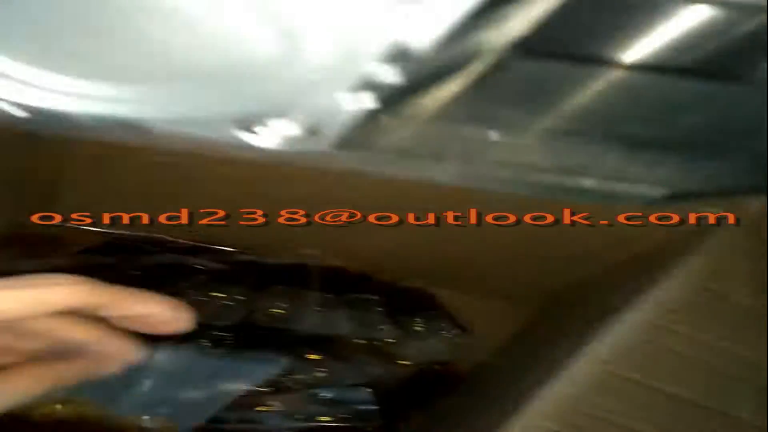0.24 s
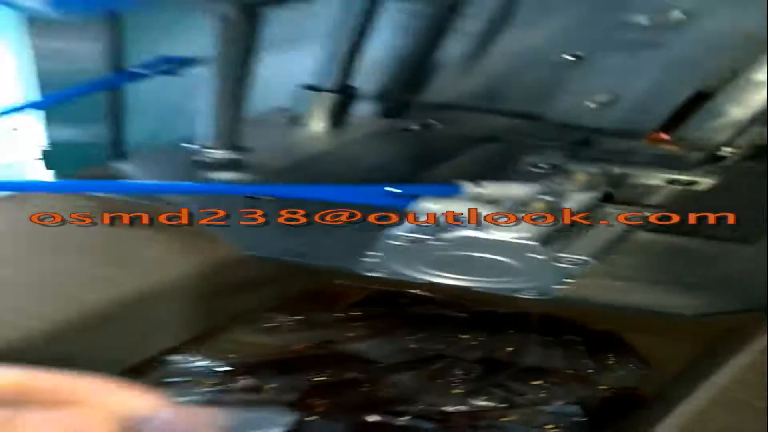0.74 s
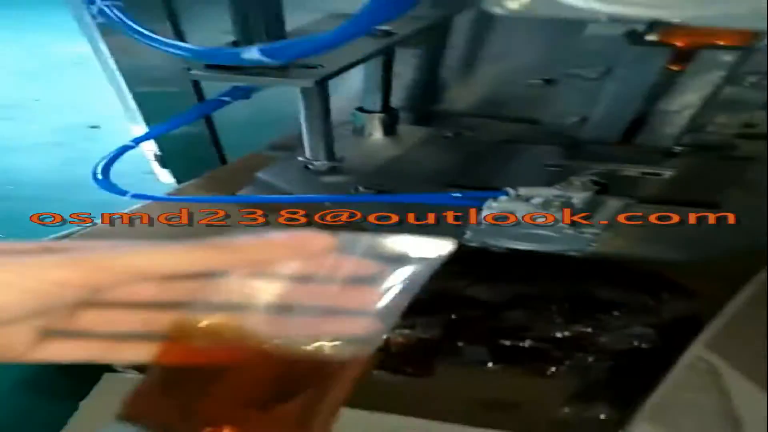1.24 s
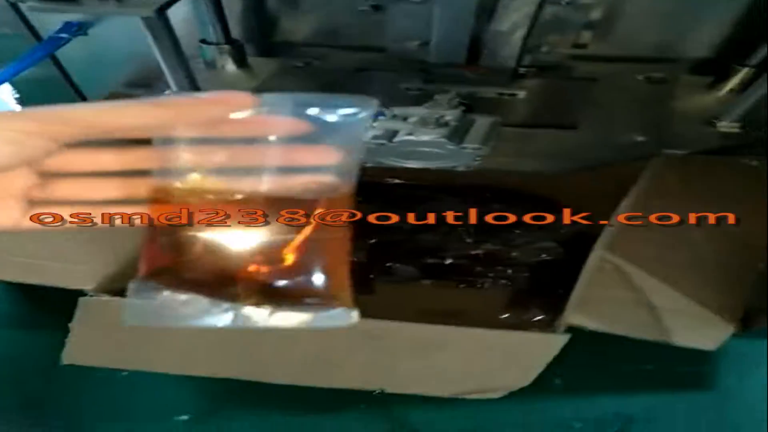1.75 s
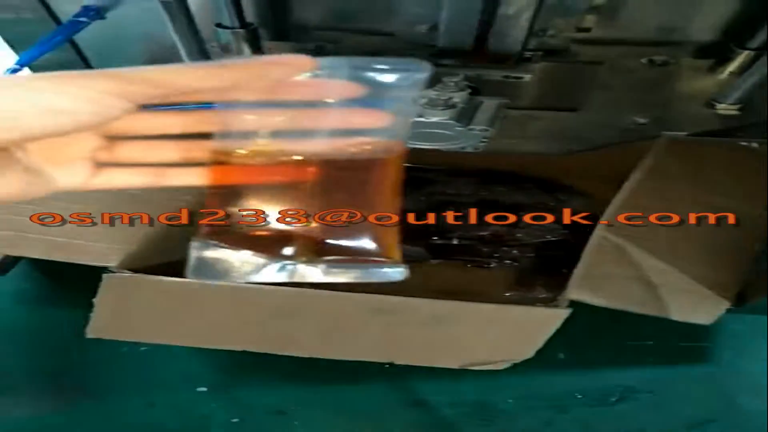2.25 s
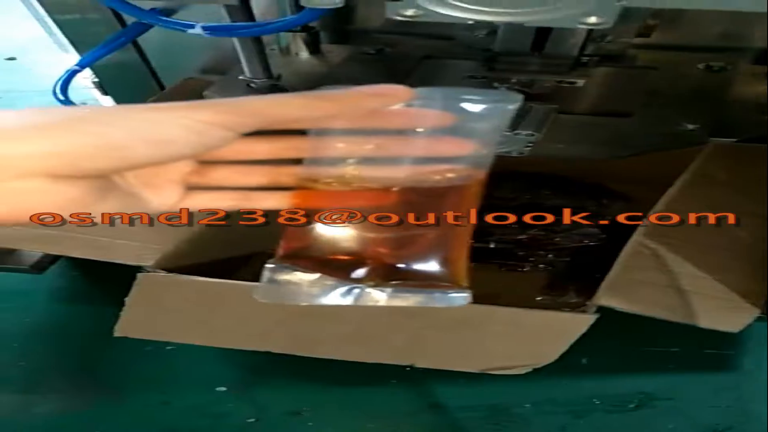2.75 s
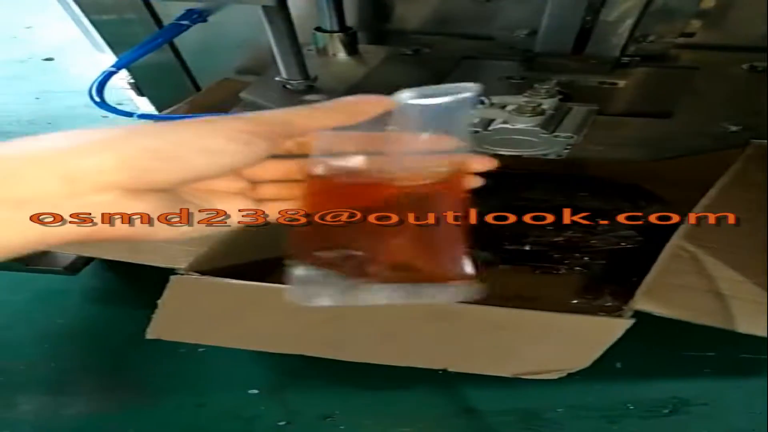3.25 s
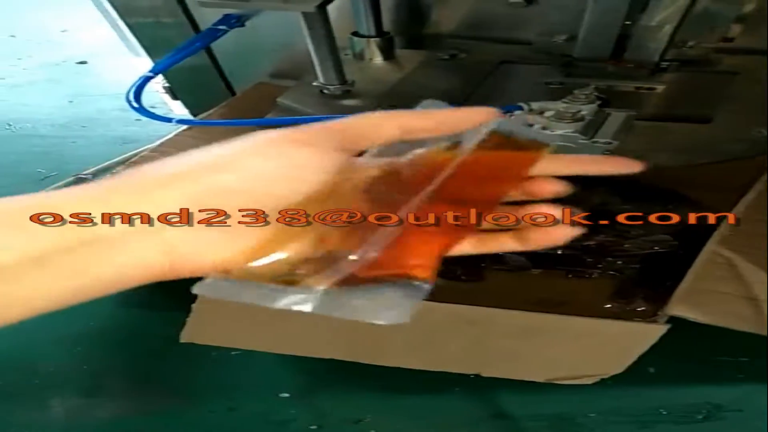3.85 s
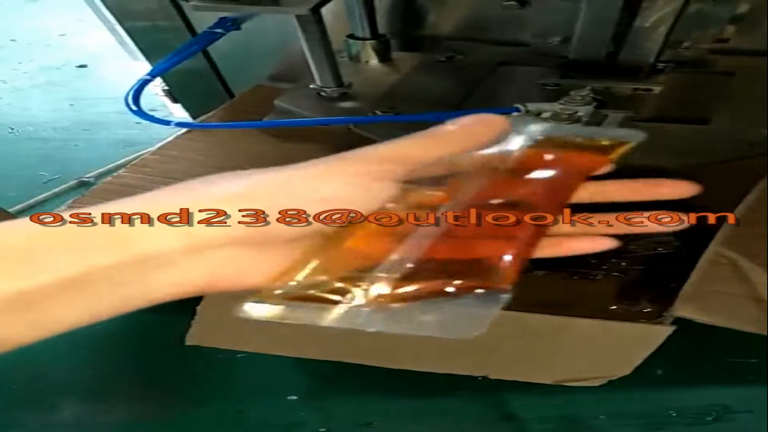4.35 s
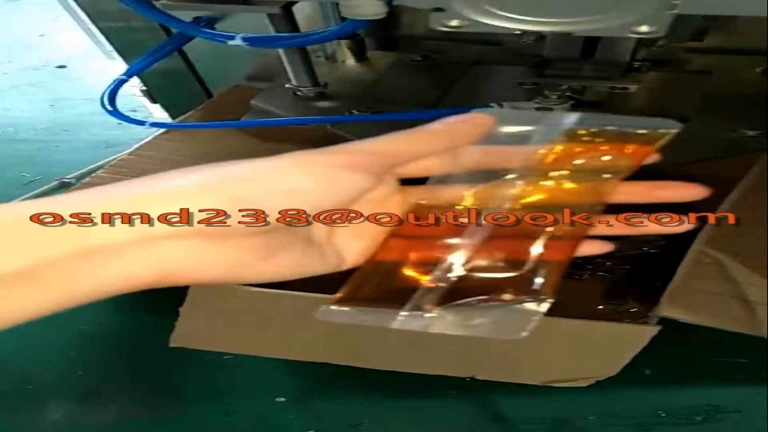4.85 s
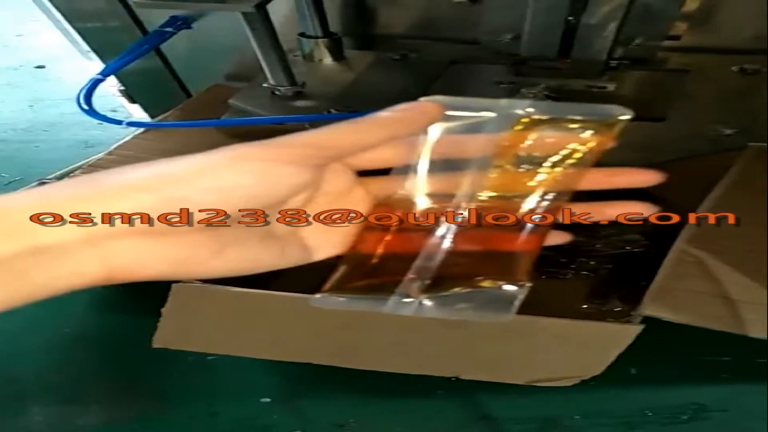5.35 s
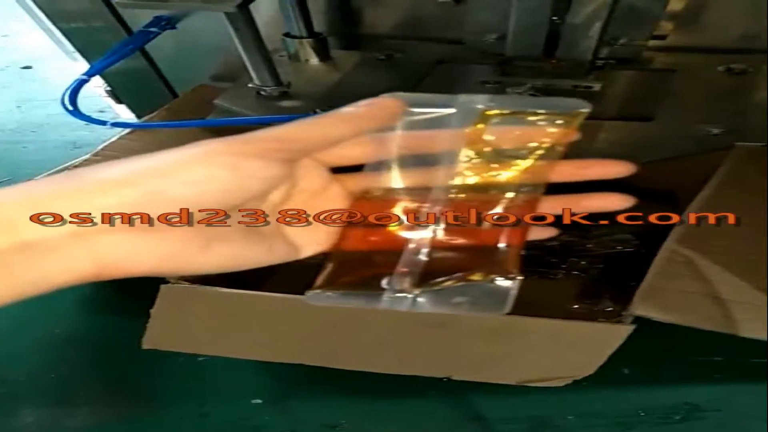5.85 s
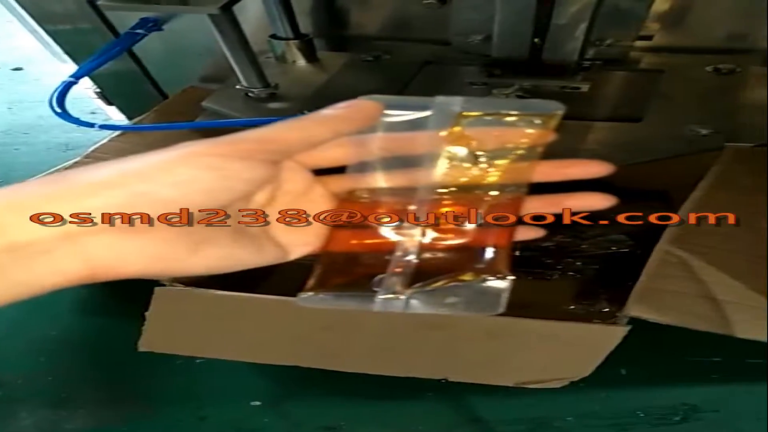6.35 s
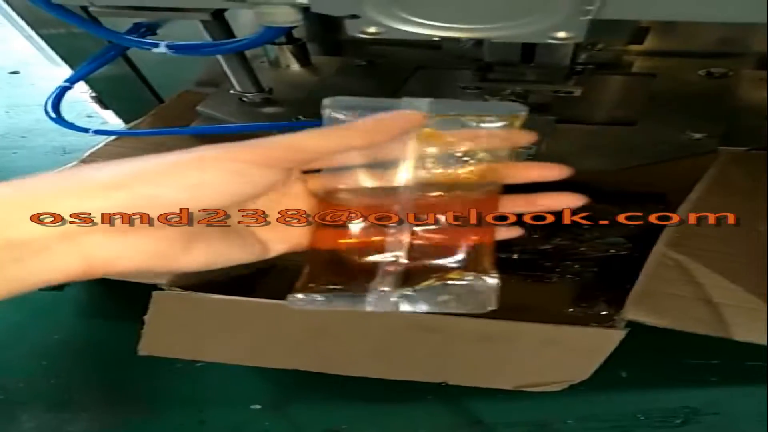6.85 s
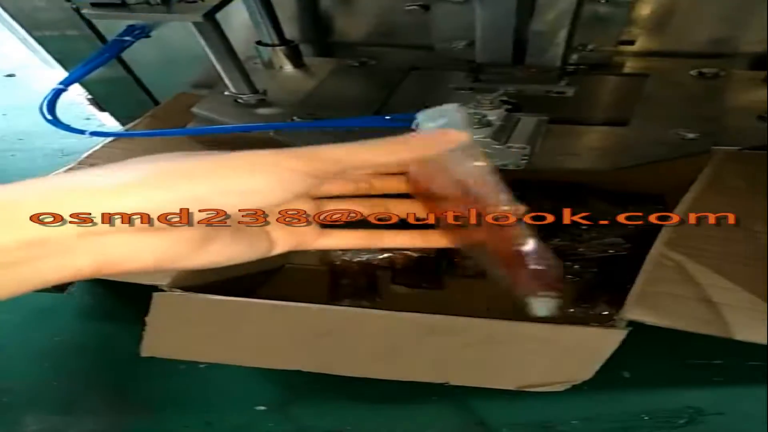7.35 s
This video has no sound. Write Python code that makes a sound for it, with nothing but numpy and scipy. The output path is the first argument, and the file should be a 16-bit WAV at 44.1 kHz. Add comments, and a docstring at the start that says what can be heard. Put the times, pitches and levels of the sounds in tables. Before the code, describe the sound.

A soft rustle of sachets in a carton gives way to the repeating clatter of a packaging machine near the microphone. Metal jaws clack, the frame thuds, a blade rings briefly and valves vent whistling air, in two bursts every two seconds, over a juddering drive. Behind it a fast tool whines, rising and then sagging in pitch, grinding and squealing now and then. The workshop adds a short echo and steady noise.

```python
"""A pneumatic sachet machine, close by, seals and cuts once every two seconds.
Its jaws clack against their stops, the steel frame thuds, the knife rings, valves vent air
and a drive moves the film. Further off in the hard-walled workshop a fast spindle whines and
slows under load. At the start, a hand stirs the filled sachets in their box."""
import sys
import numpy as np
from scipy import signal
from scipy.fft import rfft, irfft, next_fast_len
from scipy.io import wavfile
from scipy.ndimage import uniform_filter1d

SR = 44100
rng = np.random.default_rng(int(sys.argv[2]) if len(sys.argv) > 2 else 0)


def digitize_waveform(pressure):
    """Quantize a signal to 16-bit integers and store it at the path in sys.argv[1].

    Rows of a 2-D input are taken as channels; values are limited to [-1, 1].
    """
    field = np.atleast_2d(pressure).T
    bounded = np.clip(field, -1, 1)
    quanta = np.round(bounded * 32767).astype(np.int16)
    wavfile.write(sys.argv[1], SR, quanta)


N = 335601
TIME = np.arange(N) / SR
TOP_HZ = 15750  # upper edge of the sound

# machine cycles: start_s, level_db
CYCLES = [(-1.326, 0), (.677, 1.5), (2.674, -.5), (4.674, -.5), (6.674, -.5)]
# heavy parts landing on the frame in each cycle: offset_s, level_db, pitch_hz, clank_db
THUDS = [(-.003, -27, 135, -32), (.050, -22, 135, -27), (.123, -15, 146, -24), (.163, -19.5, 275, -26),
         (.192, -24, 260, -32), (.220, -16.5, 143, -26), (.258, -19.5, 250, -26), (.322, -27, 140, -36),
         (.392, -19.5, 155, -36), (.440, -24, 290, -32), (.949, -21, 170, -26), (1.130, -17.5, 250, -22),
         (1.19, -23, 170, -32), (1.25, -23, 270, -30), (1.555, -23, 165, -24)]


def jaws(ring_db=-9, focus_octaves=.16, detune=.004, part_db=-6, rattle_db=-3.6, chatter_db=2.2):
    """Each blow gives a steel rattle, a clack, a bright tick, a thud and ringing tones."""
    # tones of the jaws and frame: pitch_hz, level_db, ring_s (time to fade by 60 dB)
    steel_tones = [(141, -3, .3), (270, -5, .25), (490, -3, .2), (780, -4, .1), (1000, -6, .1),
                   (1660, 0, .14), (1735, -2, .12), (2110, -3, .16), (2330, -3, .11), (2420, -5, .1),
                   (3990, 3, .13), (4390, 0, .1), (5430, 0, .12), (12890, -2, .2)]
    # noise colours of the clank, thud and tick: frequency_hz, level_db
    clank_colour = [(100, -30), (400, -15), (800, -8), (1250, -7), (1700, -3), (1950, -6), (2250, -3),
                    (2650, -6), (3300, -5), (3900, 2), (4800, 1), (5600, 3), (6300, -2), (7400, -16),
                    (15000, -30)]
    thud_colour = [(20, -18), (45, -11), (95, -9), (142, 3), (200, -1), (275, 1), (400, -8), (700, -13),
                   (1200, -19), (4000, -50)]
    tick_colour = [(500, -20), (3000, -8), (5500, 1), (8000, 0), (10500, -4), (13000, 0), (16000, -2)]
    t = np.arange(SR // 4) / SR
    hz, tones = ringing(steel_tones, t, rise_s=.002)
    shudder = amp(-19) * np.exp(-t / .055)  # the panels keep shaking after the blow
    power, ring = np.zeros((3, N)), np.zeros((2, N))
    for s, clank_db, thud_db, tick_db, rattle_s, ring_hz in blows():
        clank = amp(clank_db) * (np.exp(-t / rattle_s) + shudder) * (1 - np.exp(-t / (rattle_s * .22)))
        thud = amp(thud_db) * (np.exp(-t / (rattle_s * 1.4)) + shudder) * (1 - np.exp(-t / .002))
        tick = amp(tick_db) * np.exp(-t / (rattle_s * .9)) * (1 - np.exp(-t / .0006))
        add(power, s, np.array([clank, thud, tick]) ** 2)
        # the struck part clacks around its own pitch and favours the tones near it
        resonance = signal.iirpeak(ring_hz, Q=16, fs=SR)
        clack = unit_level(signal.lfilter(*resonance, rng.standard_normal((2, len(t)))))
        weight = .1 + np.exp(-(np.log2(hz / ring_hz) / focus_octaves) ** 2)
        phase_turns = rng.random(len(hz)) + rng.random((2, len(hz))) * np.minimum(hz / 1500, 1)
        steel = (weight * np.exp(2j * np.pi * phase_turns)) @ tones
        shift_hz = ring_hz * detune * rng.standard_normal()  # clamping force retunes the steel
        retuned = (steel * np.exp(2j * np.pi * shift_hz * t)).real
        add(ring, s, amp(part_db) * clank * clack + amp(clank_db + ring_db) * retuned)
    clank, thud, tick = np.sqrt(power)
    chatter = unit_level(amp(chatter_db * wander(350)))  # loose parts touch again and again
    rattles = amp(rattle_db) * clank * noise(clank_colour, ripple_db=5)
    ticks = tick * noise(tick_colour, ripple_db=4)
    return chatter * (rattles + ticks) + thud * noise(thud_colour) + ring


def blows():
    """Lists every snap, clack and thud: start_s, clank_db, thud_db, tick_db, rattle_s, ring_hz."""
    # loose snaps with their own timing: start_s, clank_db, tick_db, ring_hz, rattle_s
    snaps = [(.069, -19, -55, 2500, .01), (.519, -25, -36, 2420, .005), (2.074, -15, -52, 2500, .008),
             (4.066, -21, -52, 4400, .01), (6.069, -18, -55, 2500, .014), (1.070, -10, -14, 5400, .005),
             (4.758, -13, -50, 1660, .012), (7.058, -17, -34, 5600, .008), (.677, -24, -21, 5400, .003),
             (2.512, -32, -25, 5400, .006), (5.071, -11, -30, 4390, .005), (6.495, -19, -38, 5400, .014),
             (7.101, -5, -8, 5430, .013), (7.104, -12, -30, 2380, .01), (7.126, -15, -26, 5400, .011)]
    # jaws hitting their stops in each cycle: offset_s, clank_db, tick_db, ring_hz
    clacks = [(.049, -11, -30, 4400), (.056, -14, -36, 1735), (.085, -9, -13, 4400),
              (.087, -19, -20, 12890), (.098, -14, -32, 1660), (.153, -21, -42, 600), (.168, -16, -40, 780),
              (.222, -17, -44, 5600), (.238, -11, -46, 4400), (.246, -17, -50, 2110),
              (.342, -19.5, -48, 1660), (.392, -18, -34, 4400), (.424, -20, -40, 2110),
              (1.026, -10.5, -32, 4000), (1.03, -14, -38, 2380), (1.079, -20, -38, 1660),
              (1.120, -13, -40, 780), (1.123, -5, -24, 5600), (1.126, -14.5, -40, 1680)]
    rows = [(s, db, db - 30, tick_db, rattle_s, hz) for s, db, tick_db, hz, rattle_s in snaps]
    for start, cycle_db in CYCLES:
        for s, db, tick_db, hz in clacks:  # a clack also shakes the frame
            rows.append((start + s, cycle_db + db, cycle_db + db - 17, cycle_db + tick_db, .013, hz))
        for s, db, _, clank_db in THUDS:  # a thud also rattles the steel
            rows.append((start + s, cycle_db + clank_db, cycle_db + db, cycle_db + db - 29, .014, 780))
    return rows


def frame(boom_db=-4.5, decay_s=.028, rise_s=.004, scatter=.04):
    """Each thud bends a panel, which booms briefly at a pitch of its own."""
    t = np.arange(SR // 4) / SR
    swing = np.exp(-t / decay_s) * (1 - np.exp(-t / rise_s))
    out = np.zeros(N)
    for start, cycle_db in CYCLES:
        for s, db, hz, _ in THUDS:
            pitch = hz * (1 + scatter * rng.standard_normal())
            add(out, start + s, amp(cycle_db + db + boom_db) * swing * np.sin(2 * np.pi * pitch * t))
    return out


def knife(focus_octaves=.2, other_tones_db=-8):
    """The knife bar rings on after each cut, mostly in one of its tones."""
    # tones of the bar: pitch_hz, level_db, ring_s (time to fade by 60 dB)
    bar_tones = [(2126, -1, .32), (2860, 0, .45), (4030, 2, .25), (4430, 2, .17)]
    # knife strokes: start_s, level_db, ring_hz
    cuts = [(.92, -25, 2126), (2.918, -21, 4030), (4.92, -22, 2860), (6.918, -27, 2860)]
    hz, tones = ringing(bar_tones, np.arange(SR // 2) / SR, rise_s=.006)
    out = np.zeros((2, N))
    for s, db, ring_hz in cuts:
        weight = np.maximum(amp(other_tones_db), np.exp(-(np.log2(hz / ring_hz) / focus_octaves) ** 2))
        phase = np.exp(2j * np.pi * rng.random(len(hz)) + 2j * rng.random((2, len(hz))))
        add(out, s, amp(db) * ((weight * phase) @ tones).real)
    return out


def valves(flutter_db=.9):
    """Air leaves a cylinder as a hollow hiss, a jet and a thin fizz, fading with the pressure."""
    # puffs of air in each cycle: offset_s, silencer_db, jet_db, fizz_db, rise_s, hold_s, decay_s
    vents = [(-.004, -18.5, -31, -32, .011, .11, .064), (.29, -30, -42, -41, .02, .04, .08),
             (.946, -17.5, -26, -25, .007, .07, .08), (.955, -19, -21.5, -33, .05, .15, .08),
             (1.547, -25, -31, -29, .025, .1, .14)]
    # noise colours of the silencer, jet and fizz: frequency_hz, level_db
    silencer_colour = [(100, -18), (800, -12), (1300, -20), (2600, -14), (3400, -16), (4200, -13),
                       (4800, -5), (5500, 0), (6200, -5), (6900, -14), (7600, -31), (10000, -42)]
    jet_colour = [(200, -3), (800, 2), (1400, -6), (2400, -3), (5500, 3), (7000, 3), (8000, -1),
                  (10000, -4), (12500, -3), (15000, -5)]
    fizz_colour = [(7000, -25), (10000, -15), (12000, -8), (13500, -2), (14700, 0), (15700, -5)]
    power = np.zeros((3, N))
    for s, silencer_db, jet_db, fizz_db, rise_s, hold_s, decay_s in vents:
        puff = amp([[silencer_db], [jet_db], [fizz_db]]) * burst(rise_s, hold_s, decay_s)
        for start, _ in CYCLES:
            add(power, start + s, puff ** 2)
    silencer, jet, fizz = np.sqrt(power) * amp(flutter_db * wander(60))
    return (silencer * sputter(noise(silencer_colour, ripple_db=2.5), depth_db=1.8)
            + jet * sputter(noise(jet_colour, ripple_db=2), depth_db=3)
            + fizz * sputter(noise(fizz_colour, ripple_db=2), depth_db=2.8))


def sputter(hiss, depth_db):
    """Swirling air makes patches of the spectrum swell and sink from moment to moment."""
    bands = signal.stft(hiss, nperseg=256)[2]
    patches = uniform_filter1d(rng.standard_normal(bands.shape[1:]), size=5, axis=0)
    patches = unit_level(uniform_filter1d(patches, size=6, axis=1))
    return unit_level(signal.istft(bands * amp(depth_db * patches), nperseg=256)[1][:, :N])


def valve_whistles(rise_s=.009):
    """Escaping air whistles roughly at the valve openings, lower as the pressure falls."""
    # whistles in each cycle: offset_s, length_s, start_hz, end_hz, width_hz, level_db
    whistles = [(0, .16, 6400, 5900, 550, -21), (.004, .06, 5200, 4600, 260, -22),
                (.95, .2, 5490, 5350, 520, -21)]
    out = np.zeros((2, N))
    for start, _ in CYCLES:
        for s, length_s, start_hz, end_hz, width_hz, db in whistles:
            progress = np.linspace(0, 1, int(length_s * SR))
            swell = np.minimum(progress * length_s / rise_s, 1) * (1 - progress ** 2)
            pitch = start_hz + (end_hz - start_hz) * progress
            add(out, start + s, amp(db) * swell * fuzzy_tone(pitch, width_hz))
    return out


def film_drive(judder_db=2.5):
    """The drive rumbles and judders while it moves the film, then coasts."""
    # runs of the drive in each cycle: offset_s, hold_s, level_db
    runs = [(.12, .35, -30), (.95, .44, -29), (1.55, .14, -33), (1.82, .06, -35)]
    # colour of the rumble: frequency_hz, level_db
    rumble_colour = [(20, -9), (42, -3), (80, -3), (130, -1.5), (260, -3), (500, -10), (800, -9),
                     (1400, -15.5), (2400, -14), (4000, -23), (9000, -45)]
    power = np.zeros(N)
    for s, hold_s, db in runs:
        for start, _ in CYCLES:
            add(power, start + s, (amp(db) * burst(rise_s=.02, hold_s=hold_s, decay_s=.125)) ** 2)
    return noise(rumble_colour, ripple_db=3) * np.sqrt(power) * amp(judder_db * wander(30))


def spindle(whine_db=-3.5, waver=.006, drift=.003, flicker_db=2.8, rough_db=1.3):
    """A fast tool whines and rasps, louder the harder it is pressed; it also grinds and squeals."""
    # spindle speed: time_s, turns_per_s
    speeds = [(0, 393), (.35, 398), (.6, 425), (1.3, 520), (1.7, 505), (1.92, 475), (2.5, 465), (2.9, 446),
              (3.15, 436), (3.85, 438), (4.08, 445), (4.3, 431), (4.8, 426), (5.05, 419), (5.6, 422.5),
              (5.95, 429), (6.55, 432), (7.28, 427), (7.6, 431)]
    # how hard the tool is pressed: time_s, level_db
    load = [(0, -25), (.35, -23), (.6, -36), (1.55, -35), (1.7, -20), (1.95, -12.5), (2.35, -17),
            (2.6, -26), (3.0, -21), (3.5, -32), (3.8, -24), (4.1, -25), (4.6, -30), (5.2, -30), (5.5, -34),
            (5.95, -26.5), (7.0, -27), (7.6, -34)]
    # tones of the whine: multiple_of_speed, level_db
    overtones = [(10.35, -14), (11, -1), (12.02, -5), (13, -1), (13.5, -6)]
    # the band where the tool sings best: frequency_hz, level_db
    tool_band = [(4000, -12), (4350, -5), (4700, 2), (4900, 1), (5700, 0), (6100, -7), (6600, -18)]
    # colour of the rasp: frequency_hz, level_db
    rasp_colour = [(1000, -38), (2300, -32), (4200, -28), (4700, -13), (5250, 0), (5750, 0), (6150, -6),
                   (6600, -22), (8000, -41), (15000, -43)]
    speed = over_time(speeds) * (1 + waver * wander(200) + drift * wander(10))
    turns = np.cumsum(speed) / SR
    whine = np.zeros(N)
    for multiple, db in overtones:
        level_db = db + flicker_db * wander(32) + at_pitch(tool_band, multiple * speed)
        whine += amp(level_db) * np.sin(2 * np.pi * multiple * turns)
    whine = unit_level(whine)
    whine = unit_level(.4 * whine + room(whine, [(100, .25), (10000, .25)]))
    bite = tool_bite(speed)
    rasp = noise(rasp_colour, ripple_db=3, lead_s=.00027) * amp(rough_db * wander(70))
    return amp(over_time(load)) * (amp(whine_db) * whine + rasp) + bite


def tool_bite(speed):
    """The tool grinds, and where it bites one of its tones swells into a squeal."""
    # colour of the grinding: frequency_hz, level_db
    grind_colour = [(400, -12), (1400, -9), (2400, 0), (3200, -5), (4450, 3), (5000, -5), (7000, -30)]
    # loudness of the grinding: time_s, level_db
    grind_levels = [(0, -30), (.35, -28), (.6, -43), (1.5, -48), (1.9, -35), (2.4, -31), (2.65, -42),
                    (3.1, -35), (3.5, -41), (4.2, -35), (4.38, -27), (4.75, -40), (5.5, -47), (6.1, -35),
                    (7.6, -45)]
    # squeals: middle_s, length_s, level_db, multiple_of_speed, width_hz
    squeals = [(.2, .5, -30, 11, 90), (2.0, .4, -20, 11, 50), (4.08, .16, -24, 11, 70),
               (4.39, .36, -27, 11, 60), (5.05, 1.1, -29.5, 11, 35), (5.25, .45, -30, 13, 35),
               (5.65, .14, -23, 13, 80), (6.28, .5, -28, 11, 45), (7.29, .44, -24.5, 11, 45),
               (6.5, .8, -31, 13, 60), (6.55, .6, -32, 12, 60)]
    out = noise(grind_colour, ripple_db=3) * amp(over_time(grind_levels))
    for middle_s, length_s, db, multiple, width_hz in squeals:
        near = abs(TIME - middle_s) < length_s / 2
        out[:, near] += amp(db) * np.hanning(near.sum()) * fuzzy_tone(multiple * speed[near], width_hz)
    return out


def carton(crumple_db=3):
    """A hand stirs the filled sachets in their box with a dull rustle."""
    # colour of the rustle: frequency_hz, level_db
    rustle_colour = [(25, -3), (70, 0), (180, -1), (400, -6), (1000, -10), (3000, -15), (9000, -34)]
    # loudness of the rustle: time_s, level_db
    rustle_levels = [(0, -29), (.3, -33), (.55, -34), (.7, -38), (1.1, -60)]
    return noise(rustle_colour) * amp(over_time(rustle_levels) + crumple_db * wander(25))


def workshop(floor_db=-40.5, swell_db=1):
    """Steady noise of the hall, with a few passing hums."""
    # colour of the hall's noise: frequency_hz, level_db
    hall_colour = [(20, -3), (45, -1), (90, -9), (140, -8), (200, -11), (280, -7), (420, -13), (900, -12),
                   (1400, -15), (2300, -12), (4000, -9), (6200, -15), (7000, -26), (10000, -33),
                   (15000, -41)]
    # faint tones: start_s, length_s, start_hz, end_hz, level_db
    hums = [(-.06, .22, 375, 392, -28), (0, .32, 672, 668, -35), (.59, .16, 375, 440, -30),
            (3.0, 2.6, 2070, 1945, -51)]
    out = noise(hall_colour) * amp(floor_db + swell_db * wander(8))
    for s, length_s, start_hz, end_hz, db in hums:
        hz = np.linspace(start_hz, end_hz, int(length_s * SR))
        add(out, s, amp(db) * np.hanning(len(hz)) * np.sin(2 * np.pi * np.cumsum(hz) / SR))
    return out


def room(sound, fade_times, echoes_per_s=3000):
    """Echoes off the walls; fade_times lists frequency_hz, ring_s (time to fade by 60 dB)."""
    echoes = rng.standard_normal((2, SR)) * (rng.random((2, SR)) < echoes_per_s / SR)
    echoes *= np.arange(SR) > .005 * SR  # a short gap before the first echo
    hz, t, bands = signal.stft(echoes, SR, nperseg=256)
    bands[1, hz < 400] = bands[0, hz < 400]  # the bass reaches both sides alike
    tail = signal.istft(bands * amp(-60 * t / at_pitch(fade_times, hz)[:, None]), SR, nperseg=256)[1]
    return signal.fftconvolve(np.atleast_2d(sound), tail / np.linalg.norm(tail[0]), axes=1)[:, :N]


def noise(colour, ripple_db=0., lead_s=.00048, diffuse_hz=1500):
    """Stereo noise, rippled by crowded resonances: alike in the bass, apart in the treble."""
    # how alike left and right are: frequency_hz, likeness (0 to 1)
    likeness = [(30, .7), (130, .96), (260, .88), (500, .55), (1000, .45), (4000, .25), (14000, .45)]
    size = next_fast_len(N, True)
    hz = np.fft.rfftfreq(size, 1 / SR)
    ripple_hz = np.geomspace(600, TOP_HZ, 256)
    ripple = ripple_db * np.interp(hz, ripple_hz, rng.standard_normal(len(ripple_hz)), left=0)
    shared, separate = rng.standard_normal((2, 2 * len(hz))).view(complex)
    same = at_pitch(likeness, hz)
    # the left side leads, less so below diffuse_hz, where sound comes from all around
    left = shared * np.exp(2j * np.pi * hz * lead_s * (1 - np.exp(-hz / diffuse_hz)))
    right = same * shared + np.sqrt(1 - same ** 2) * separate
    return unit_level(irfft(np.array([left, right]) * amp(at_pitch(colour, hz) + ripple), size)[:, :N])


def ringing(table, t, rise_s):
    """The pitches of struck metal and a fading complex wave for each."""
    hz, db, ring_s = np.transpose(table)
    fade = amp(db[:, None] - 60 * t / ring_s[:, None]) * (1 - np.exp(-t / rise_s))
    return hz, fade * np.exp(2j * np.pi * hz[:, None] * t)


def fuzzy_tone(hz, width_hz):
    """A narrow band of noise that follows the pitch curve hz."""
    lowpass = signal.butter(2, width_hz / 2, fs=SR, output="sos")
    flutter = signal.sosfilt(lowpass, rng.standard_normal((2, 2 * len(hz))).view(complex))
    return unit_level((flutter * np.exp(2j * np.pi * np.cumsum(hz) / SR)).real)


def burst(rise_s, hold_s, decay_s):
    """A loudness curve that rises, holds and dies away."""
    t = np.arange(SR) / SR
    return np.minimum(t / rise_s, 1) * np.exp(-np.maximum(t - hold_s, 0) / decay_s)


def wander(rate_hz):
    """A smooth random curve of typical size 1 that wobbles up to about rate_hz."""
    points, step = 2 ** 14, 32
    hz = np.fft.rfftfreq(points, step / SR)
    slow = unit_level(irfft(rfft(rng.standard_normal(points)) * np.exp(-(hz / rate_hz) ** 2)))
    return np.interp(np.arange(N) / step, np.arange(points), slow)


def amp(db):
    """Turns decibels into a gain."""
    return 10 ** (np.asarray(db) / 20)


def unit_level(x):
    """Scales a signal to an average (rms) level of 1."""
    return x / np.sqrt(np.mean(x ** 2) + 1e-20)


def at_pitch(table, hz):
    """Reads a table on a log-frequency axis."""
    table_hz, value = np.transpose(table)
    return np.interp(np.log(hz + 1), np.log(table_hz + 1), value)


def over_time(table):
    """Joins a table's timed points with straight lines."""
    return np.interp(TIME, *np.transpose(table))


def add(mix, start_s, sound):
    """Mixes a sound in at start_s, dropping what falls outside."""
    start = round(start_s * SR)
    sound = sound[..., max(-start, 0):]
    part = mix[..., max(start, 0):][..., :sound.shape[-1]]
    part += sound[..., :part.shape[-1]]


def scene(knock_echo_db=-8, air_echo_db=-12):
    """The machine in its room, with the spindle and the hall behind it."""
    knocks = jaws() + frame() + knife()
    air = valves() + valve_whistles()
    to_walls = amp(knock_echo_db) * knocks + amp(air_echo_db) * air
    echo = room(to_walls, [(150, .65), (1000, .7), (5000, .5), (14000, .3)])
    return knocks + air + echo + film_drive() + spindle() + carton() + workshop()


def record(dry):
    """Clips the loudest peaks, then removes the treble above TOP_HZ."""
    lowpass = signal.firwin(511, TOP_HZ, window=("kaiser", 9), fs=SR)
    return signal.oaconvolve(np.clip(dry, -1, 1), lowpass[None], "same")


dry = scene()
out = record(dry)
digitize_waveform(out)
```